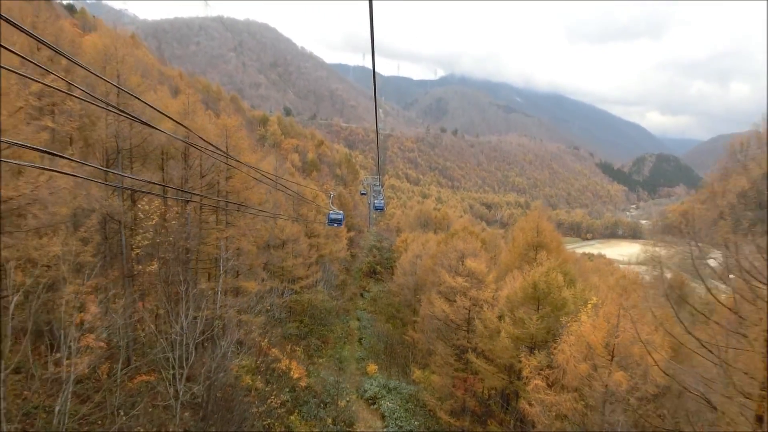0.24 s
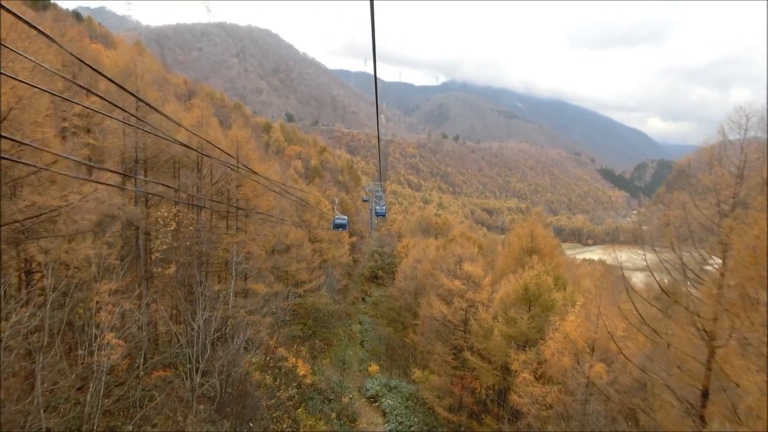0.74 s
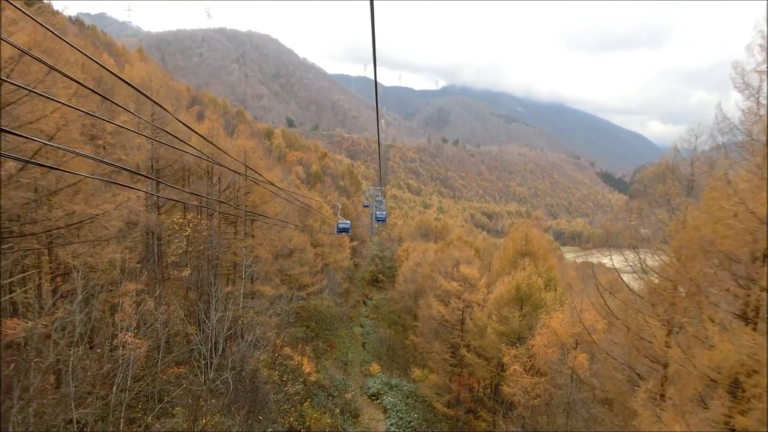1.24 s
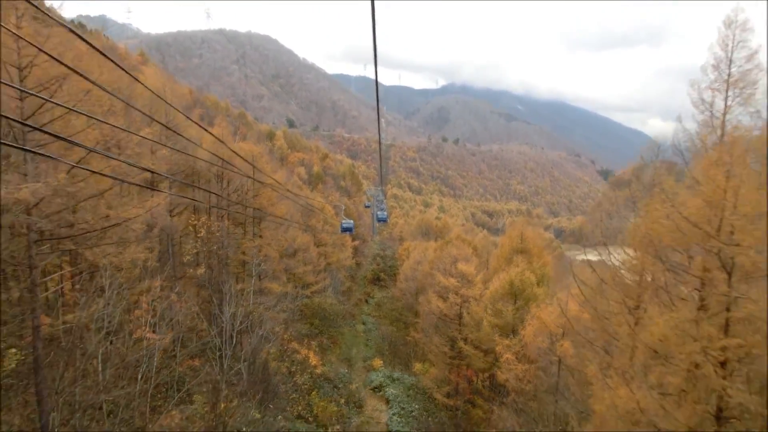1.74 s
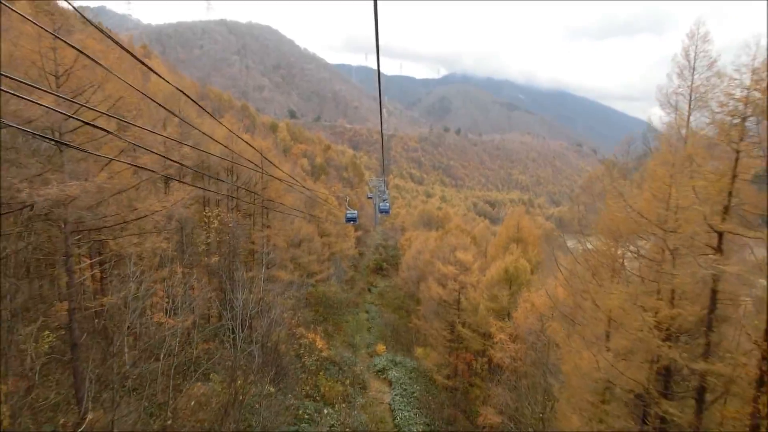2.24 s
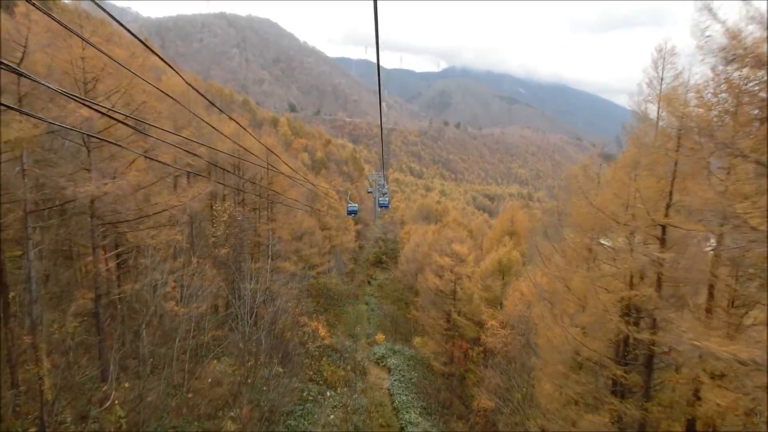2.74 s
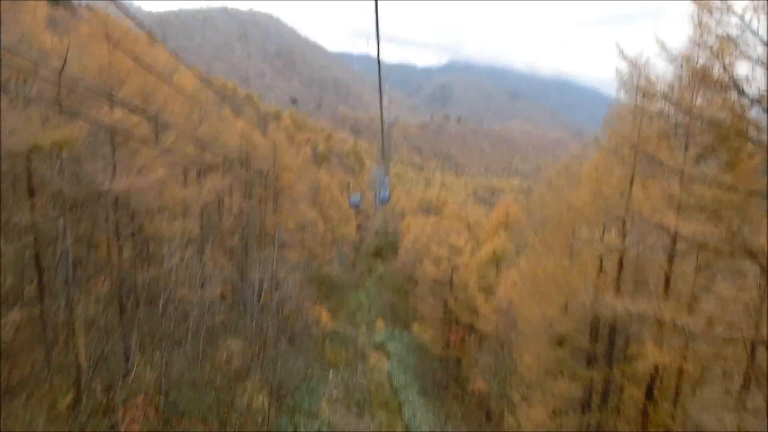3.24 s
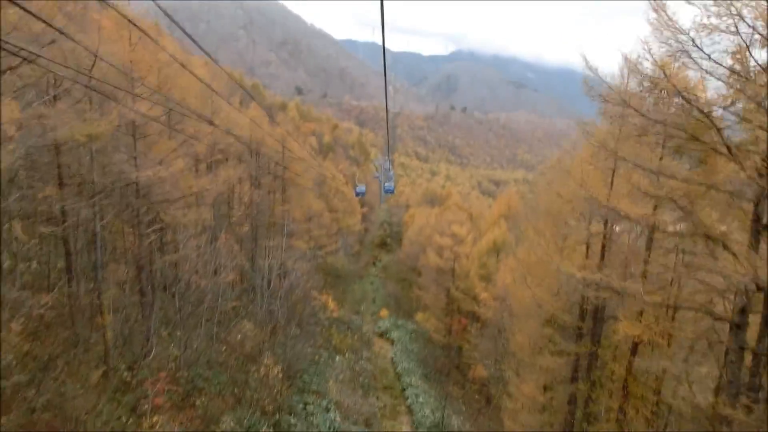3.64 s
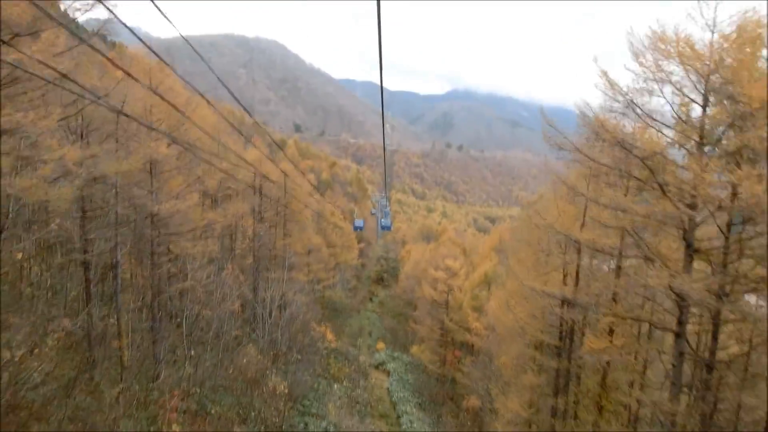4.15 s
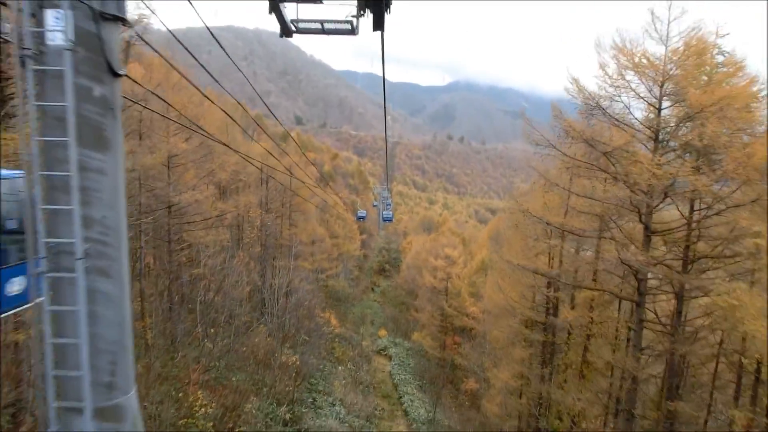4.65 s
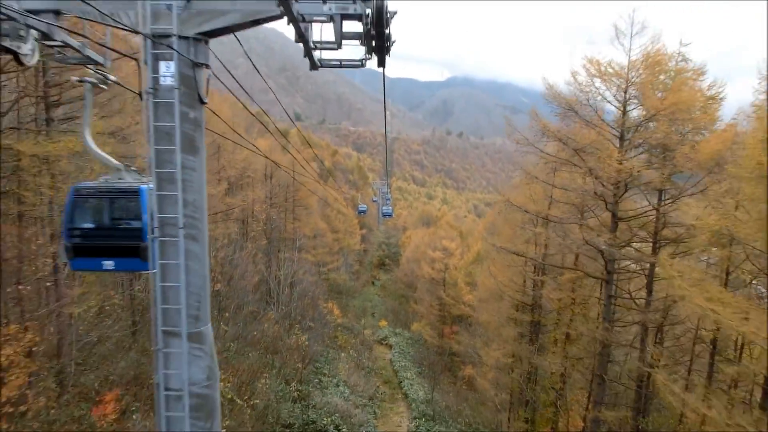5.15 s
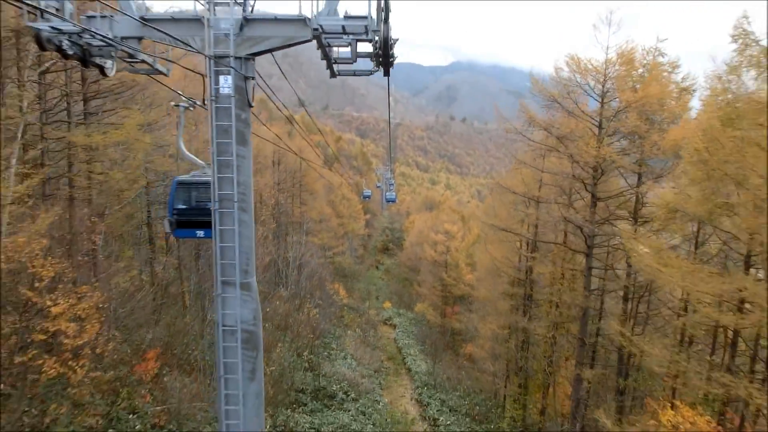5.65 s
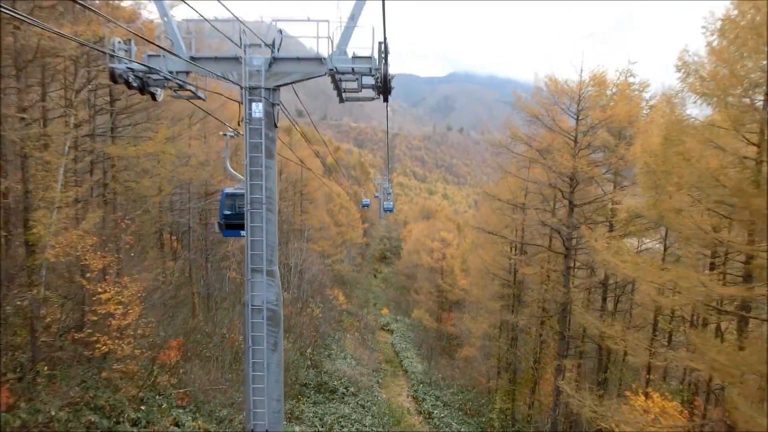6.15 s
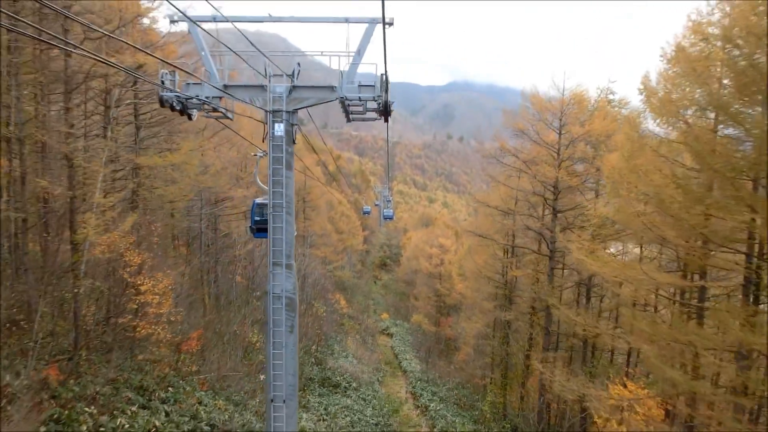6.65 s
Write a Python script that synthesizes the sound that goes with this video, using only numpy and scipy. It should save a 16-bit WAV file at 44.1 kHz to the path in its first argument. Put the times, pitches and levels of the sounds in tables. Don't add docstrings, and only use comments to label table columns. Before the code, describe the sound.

Heard close inside a moving gondola cabin: a deep, pulsing rope hum with faint wind hiss and small ticks. After three seconds the cabin reaches a tower; hard snaps, booming floor, grainy roar and metal cracks erupt, followed by a brighter clattering second wheel set. By about five seconds the rattle fades, leaving the low hum and a somewhat fuller rush of air.

```python
import sys
import numpy as np
from scipy import signal
from scipy.fft import rfft, irfft, next_fast_len
from scipy.io import wavfile

SR = 44100
rng = np.random.default_rng(int(sys.argv[2]) if len(sys.argv) > 2 else 0)


def gain_from_db(level_db):
    decades = np.asarray(level_db, float) / 20
    return 10 ** decades


def transcribe(signal):
    frames = np.atleast_2d(signal).T
    limited = np.clip(frames, -1, 1)
    pcm = np.round(limited * 32767).astype(np.int16)
    wavfile.write(sys.argv[1], SR, pcm)


N = 304012
LONG = next_fast_len(N)
HZ = np.fft.rfftfreq(LONG, 1 / SR)
TIME = np.arange(N) / SR

# [t/s, strand rate f/Hz, shell boom f/Hz, roof drone f/Hz]
ROPE = [(0.0, 81.3, 82, 241.7), (0.8, 84.2, 84, 249), (1.6, 86, 90, 258), (2.1, 86.77, 96, 262.4),
        (2.95, 88.23, 95, 264.8), (3.5, 87.6, 87.5, 261.4), (4.2, 85.2, 89, 255), (4.45, 84.2, 85, 260),
        (5.1, 84.5, 85, 264.3), (5.6, 84.5, 85, 266.7), (6.0, 83.87, 82.5, 262), (6.89, 83, 84, 251)]
# [start t/s, length t/s, level/dB]
BOOMS = [(.06, 0.21, -35), (.43, 0.067, -37.5), (.61, 0.15, -34), (.91, 0.26, -34), (1.27, 0.041, -31),
         (1.4, 0.14, -27.5), (1.62, 0.053, -28), (1.74, 0.2, -28), (2.02, 0.16, -26), (2.26, 0.15, -30.5),
         (2.49, 0.06, -26.5), (2.68, 0.13, -29.5), (2.92, 0.14, -27), (3.11, 0.22, -27), (3.5, 0.27, -20.5),
         (3.91, 0.052, -27), (4.04, 0.037, -27), (4.21, 0.02, -45), (4.35, 0.3, -26.5), (4.79, 0.057, -28),
         (4.98, 0.16, -27), (5.25, 0.02, -25.5), (5.4, 0.1, -25.5), (5.58, 0.12, -26), (5.8, 0.1, -28.5),
         (6.02, 0.04, -30), (6.22, 0.089, -31), (6.44, 0.11, -30.5), (6.69, 0.044, -29.5),
         (6.83, 0.072, -38)]
SWAYS = [(0, 0.22, -33.5), (.5, 0.093, -37), (.8, 0.047, -49), (1.12, 0.12, -40), (1.7, .12, -42),
         (2.17, .05, -32), (2.86, 0.044, -31), (3.06, 0.11, -20), (3.22, 0.19, -27), (3.47, 0.27, -20.5),
         (3.68, 0.51, -28.5), (4.37, 0.26, -34), (5.0, 0.12, -28), (5.43, 0.19, -28), (5.94, 0.12, -33.5),
         (6.14, 0.16, -32.5), (6.4, 0.21, -32.5), (6.74, 0.047, -31)]
# [start t/s, length t/s, level/dB, order]
SINGING = [(0, 0.28, -48.5, 4), (5.15, 0.07, -45, 4), (1.57, 0.21, -47, 4), (2.542, 0.29, -48, 4),
           (4.307, 0.18, -44, 4), (4.9, 0.15, -47, 4), (5.894, 0.35, -47.5, 4), (0, 0.23, -44.5, 2),
           (1.004, 0.4, -51, 2), (1.612, 0.51, -40, 2), (2.196, 0.2, -40.5, 2), (2.59, 0.12, -39, 2),
           (5.527, 0.25, -43, 2), (6.294, 0.23, -46, 2), (0.447, 0.69, -51, 3), (0.703, 0.33, -47.5, 2),
           (1.566, 0.16, -44, 3), (1.952, 0.94, -42, 3), (1.32, 0.26, -48.5, 2), (1.854, .08, -43, 2),
           (4.883, 0.094, -38, 3), (5.1, 0.14, -39, 3), (5.35, .1, -42.5, 3), (5.525, 0.067, -47, 3),
           (.98, 0.065, -50, 4), (5.74, 0.081, -44, 3), (6.33, 0.4, -44, 3)]
# [start t/s, length t/s, level/dB]
FIFTH_SPELLS = [
    (.98, .42, -58.5),
    (5.7, 0.15, -54),
]
CALM_DB = {"boom": -44, "sway": -41, "floor": -48.5, "wall": -76.5, "order": -55}
# [start t/s, length t/s, level/dB]
FLOOR_JOLTS = [(0, 0.074, -45), (1.65, .15, -48), (2.15, 0.08, -39), (2.75, 0.14, -38), (3.08, 0.072, -33),
               (3.18, 0.15, -21.5), (3.39, .12, -25), (3.61, 0.21, -26), (3.74, 0.073, -19.5),
               (3.88, 0.11, -30.5), (4.03, 0.37, -34), (4.47, 0.21, -31.5), (5.07, 0.043, -32),
               (5.27, 0.033, -36.5), (5.45, 0.24, -33), (6.3, 0.15, -40)]
WALL_JOLTS = [(1.65, 0.2, -65), (2.0, 0.22, -52), (2.74, 0.067, -39.5), (2.95, 0.094, -35),
              (3.17, 0.083, -26.5), (3.4, .33, -25), (3.9, 0.088, -32.5), (4.36, 0.081, -49),
              (4.48, 0.1, -35.5), (5.06, .08, -43), (5.42, 0.13, -31.5)]
# [t/s, level/dB]
SHAKE = [(0.0, -43), (1.4, -39), (2.15, -36), (2.9, -39.5), (2.99, -34), (3.11, -19), (3.3, -25),
         (3.45, -24), (3.59, -16.5), (3.7, -19.5), (3.95, -23.5), (4.06, -32.5), (4.14, -26), (4.42, -32.5),
         (4.54, -29), (4.78, -36), (5.5, -35.5), (6.89, -41)]
# [f/Hz, density level/dB per Hz]
SHUDDER = [(20, -10), (60, 5), (140, 3.5), (180, 1), (260, -2), (310, -5), (380, -12.5), (520, -17.5),
           (900, -25), (1600, -90)]
# [t/s, level/dB]
GRIP_PRESSURE = [
    [(2.9, -51), (3.04, -48), (3.07, -33.5), (3.18, -29), (3.3, -30.5), (3.43, -31), (3.58, -24.5),
     (3.65, -28), (4.065, -38.5)],
    [(4.05, -34), (4.09, -37.5), (4.146, -29.5), (4.216, -31), (4.25, -24), (4.33, -36), (4.38, -30.5),
     (4.74, -34.5), (5.1, -54)],
]
# [f/Hz, width f/Hz, level/dB]
PANELS = [
    [(707, 89, -2.5), (1630, 230, 0.5), (2100, 280, -1), (3200, 110, -20), (4750, 310, -9), (7300, 110, -23)],
    [(503, 38, -2.5), (929, 57, -2.5), (1930, 99, -5.5), (2600, 130, -14), (2800, 130, -17), (3390, 54, -7), (3700, 120, -3), (4360, 360, -5), (5180, 400, -1), (5900, 67, -18), (6750, 150, -27), (10700, 820, -8)],
]
# [f/Hz, density level/dB per Hz]
ROARS = [
    [(210, -29), (350, 0.5), (472, -7), (802, -3.5), (1380, -8.5), (1600, -14.5), (2580, -21), (4630, -23), (9000, -33.5), (11700, -54), (19800, -120)],
    [(210, -24), (350, 1), (459, -11), (498, -14), (603, -5.5), (918, -0.5), (1330, -7.5), (2540, -9.5), (9000, -29), (11700, -63), (19800, -120)],
]
# share of panel ring over roar, and treble [level/dB]
PANEL_SHARE = [0.48, 0.71]
RATTLE_TREBLE_DB = [-18.5, -11]
# [t/s, peak level/dB, treble level/dB, ring f/Hz]
KNOCKS = [(3.0575, -19.5, -46, 2050), (3.1553, -44, -40, 1660), (3.179, -17, -41, 1530),
          (3.2385, -25, -37.5, 2000), (3.2912, -25.5, -37.5, 2020), (3.3496, -44, -48, 1630),
          (3.4451, -20, -36, 2100), (3.455, -26, -43, 1620), (3.494, -40, -36, 1990),
          (3.51, -45, -42, 2080), (3.5297, -40, -43, 1690), (3.5781, -17.5, -52, 1500),
          (3.5934, -26, -55, 1493), (3.7367, -31, -65, 1200), (3.853, -25.5, -50, 1760),
          (3.955, -41, -62, 1570)]
# [t/s, peak level/dB, treble level/dB, ring f/Hz, treble centre f/Hz]
SNAPS = [
    (3.026, -11.5, -35, 3700, 6440),
    (3.058, -19, -49, 3220, 4250),
    (3.1776, -5, -37, 2400, 4340),
    (3.1965, -16, -23.5, 4260, 7000),
    (3.216, -35, -24, 2210, 6460),
    (3.4206, -13, -35, 1400, 5600),
    (4.229, -9, -22.5, 4500, 5600),
]
CLANKS = [(4.108, -30, -63, 1670, 8820), (4.1505, -19, -43, 1920, 8450), (4.1682, -23, -38, 1710, 11400),
          (4.192, -18.5, -57, 1930, 5700), (4.232, -11.5, -31.5, 2780, 5800),
          (4.2449, -17, -37, 1640, 6440), (4.2952, -18, -32, 1650, 5300), (4.364, -27, -32, 2040, 10700),
          (4.3833, -32, -46, 1640, 7200), (4.4143, -26, -40, 1900, 6860), (4.439, -18, -55, 2560, 4800),
          (4.5, -29, -45, 1930, 6700), (4.558, -24, -38, 2600, 5680), (4.613, -24, -37, 2140, 5650),
          (4.6372, -22, -33, 1930, 5470), (4.686, -37, -46, 2630, 8310), (4.7378, -26.5, -62, 2550, 7190)]
# [t/s, peak level/dB, centre f/Hz]
CRACKS = [(3.1783, -10, 2600), (3.183, -25, 1200), (3.239, -16, 1000), (3.4217, -16, 2500),
          (3.442, -23, 1800), (3.579, -15, 1800), (3.5955, -25, 1600), (3.742, -33, 1100),
          (3.9549, -22.5, 800), (4.126, -27, 900), (4.147, -16, 1200), (4.192, -23, 1800),
          (4.23, -12, 1200), (4.2467, -14, 1600), (4.4395, -29, 2600), (4.611, -19, 2550),
          (3.028, -20, 4000), (3.197, -29, 4500), (3.217, -28, 6000), (3.293, -35, 2000), (3.544, -17, 700),
          (3.62, -28, 700), (4.416, -24, 1000), (4.498, -31, 1200)]
# [f/Hz, level/dB, t60 t/s]
ARM = [(925, -2, 0.15), (1930, -4.5, 0.11), (2610, -6, 0.1), (2870, -16, .08), (4500, -13, .06),
       (5050, -13, 0.069)]
# [t/s, level/dB]
ARM_BLOWS = [(4.364, -29), (4.39, -30), (4.412, -35), (4.439, -30), (4.456, -35), (4.498, -30),
             (4.526, -38), (4.548, -30), (4.614, -34), (4.644, -30), (4.668, -42), (4.745, -38),
             (4.79, -40)]
# [t/s, peak level/dB, pitch f/Hz, t60 t/s]
THUDS = [(2.94, -37, 292, 0.38), (3.74, -19.5, 864, 0.052), (3.954, -24, 704, 0.047), (4.1, -30, 474, 0.65),
         (4.638, -31, 950, 0.12), (5.44, -48, 800, 0.2), (4.55, -34.5, 270.5, 0.75),
         (4.742, -36, 886, 0.13), (3.092, -29, 604, 0.094), (3.176, -18, 816, 0.073),
         (3.237, -19, 637, 0.058), (3.292, -30, 700, 0.12), (3.389, -32, 980, 0.04),
         (3.443, -24.5, 670, 0.11), (3.543, -25, 575, 0.1), (3.617, -27, 630, 0.081),
         (3.663, -24, 800, 0.068), (3.85, -35, 800, 0.09), (4.103, -32, 820, 0.078),
         (4.123, -28, 860, 0.092), (4.145, -22, 810, 0.11), (4.347, -31.5, 468, 0.13),
         (4.412, -33, 895, 0.055), (4.495, -34, 918, .07), (4.544, -33, 939, .08), (4.61, -36, 930, 0.089),
         (3.411, -39, 276, 0.22), (4.449, -34, 200, 0.36)]
# [t/s, peak level/dB, pitch f/Hz, t60 t/s]
FLECKS = [(3.178, -28, 4260, .04), (3.196, -24, 4400, .03), (3.236, -31, 4870, 0.067),
          (3.237, -43, 4300, 0.061), (3.289, -43, 4520, 0.045), (3.29, -35, 7300, .05),
          (3.347, -35, 4800, .08), (3.45, -44, 4760, .08), (3.472, -34, 4500, 0.044),
          (3.495, -47, 4800, .1), (3.523, -37, 5900, .07), (3.56, -32, 3200, .04),
          (3.572, -37, 4900, 0.099), (3.577, -27, 4320, .04), (3.776, -35.5, 1620, 0.33),
          (3.787, -32.5, 2160, 0.18), (3.816, -35.5, 2310, 0.18), (4.232, -33, 2980, 0.037),
          (4.245, -21, 3900, 0.044), (4.295, -42, 5900, 0.061), (4.36, -34, 2070, .12),
          (4.367, -36, 4650, .08), (4.415, -33, 4700, .04), (4.455, -31, 4470, .04),
          (4.458, -51, 2560, 0.3), (4.549, -32, 2860, 0.11), (4.565, -41, 3700, .06),
          (4.611, -35, 5850, .04), (4.612, -35, 4600, 0.2), (4.635, -31, 6000, 0.085),
          (4.665, -35, 1900, 0.12), (4.685, -39, 4250, 0.055), (4.738, -35, 2540, .04),
          (4.774, -37, 2500, 0.14), (4.81, -41, 2170, .12), (3.594, -17, 1510, 0.062),
          (4.72, -42, 3330, 0.24), (5.03, -41, 1010, 0.4), (3.092, -40, 4390, 0.043),
          (3.144, -42, 4410, .06), (3.156, -30, 5940, .04), (3.16, -39, 4750, .08), (3.162, -35, 4350, .08),
          (3.345, -44, 4390, .07), (3.31, -42, 4900, .06), (3.61, -50, 4900, .15), (3.7, -41, 4770, .06),
          (3.825, -41, 4420, .06), (3.92, -45, 4850, .12), (3.095, -30, 1020, 0.087),
          (3.255, -29, 2010, .06), (3.39, -31, 1000, 0.06), (3.577, -17, 1390, .04)]
# [t/s, peak level/dB, t60 t/s]
BUMPS = [
    (2.72, -51, 0.43),
    (5.3, -45, 0.7),
    (5.421, -42.5, 0.6),
    (5.7, -46.5, 0.37),
]
# [t/s, peak level/dB, pitch f/Hz]
TICKS = [
    (0.3244, -49, 7900),
    (0.564, -38, 3980),
    (1.1442, -43, 4880),
    (1.2451, -36, 11800),
    (1.5, -42, 6640),
    (3.061, -19, 3350),
    (5.07, -51, 2300),
    (5.46, -41, 4000),
    (6.66, -39, 4200),
]
# [start t/s, end t/s, level/dB]
RUSTLES = [
    (0.67, 1.16, -52.5),
    (2.171, 2.42, -57.5),
    (6.187, 6.37, -49.5),
]
# [start t/s, end t/s, level/dB, centre f/Hz]
GAP_HISS = [
    (2.3, 3.8, -64, 6500),
    (6.25, 6.9, -59, 7800),
    (5.2, 5.8, -59, 4150),
]
# [t/s, level/dB]
WIND = [(0.0, -53), (1.6, -53), (2.46, -52), (2.95, -48), (4.95, -46.5), (5.2, -48), (5.4, -48.5),
        (6.1, -49), (6.89, -48)]
# [f/Hz, density level/dB per Hz]
WIND_COLOUR = [(250, 3.5), (450, -3), (700, 2), (1100, 0.5), (1350, -5), (1660, -1), (1900, -5.5),
               (2200, -5), (2500, -9), (4000, -15.5), (6000, -17.5), (9000, -19), (12500, -23.5),
               (15000, -24.5)]
# [f/Hz, level/dB]
LEAN = [(60, 2.5), (130, 3), (290, 2.5), (640, 3), (1410, 2), (3100, 1.5), (8000, 2), (13000, 1.5)]
# [f/Hz, width f/Hz, added level/dB]
HOUSING = [(4390, 460, -13.5), (7200, 780, -9.5), (10700, 1200, -10.5)]


def evened(x):
    return x / np.sqrt(np.mean(x ** 2) + 1e-20)


def read(points, hz):
    f, value = np.transpose(points)
    return np.interp(np.log(hz + 1), np.log(f + 1), value)


def columns(rows):
    s, *rest = np.transpose(rows)
    return [np.interp(TIME, s, c) for c in rest]


def add(mix, s, sound):
    part = mix[round(s * SR):][:len(sound)]
    part += sound[:len(part)]


def drift(top_hz):
    steps = N // 128 + 2
    slow_hz = np.fft.rfftfreq(steps, N / SR / steps)
    wander = irfft(rfft(rng.standard_normal(steps)) / (1 + (slow_hz / top_hz) ** 4), steps)
    return evened(np.interp(TIME, np.linspace(0, N / SR, steps), wander))


def coloured(gain):
    return evened(irfft(rfft(rng.standard_normal(LONG)) * gain, LONG)[:N])


def ring(x, hz, width):
    pole = np.exp((2j * hz - width) * np.pi / SR)
    return evened(signal.lfilter([1], np.poly([pole, pole]), x).real)


def wavering(hz, waver_hz, rough):
    turn = 2 * np.pi * np.cumsum(hz + waver_hz * drift(7.14)) / SR
    in_phase = (1 + rough * drift(17.0)) * np.sin(turn)
    return evened(in_phase + rough * drift(9.5) * np.cos(turn))


def surges(rows, calm_db):
    swell_s, ebb_s = 0.012, 0.045
    t = TIME[::128]
    power = np.full(len(t), gain_from_db(2 * calm_db))
    for s, length, db in rows:
        away = np.maximum((s - t) / swell_s, (t - s - length) / ebb_s)
        power += gain_from_db(2 * db) * np.exp(-np.clip(away + .5, 0, 9) ** 2)
    return np.interp(TIME, t, np.sqrt(power))


def hail(size):
    strength = gain_from_db(0.78 * np.minimum(rng.exponential(1, size), 4))
    return strength * (rng.random(size) < 4000 / SR) * rng.standard_normal(size)


def stirred(blows):
    strike_db, strike_t60 = 18, .09
    gain, t = np.ones(N), TIME[:SR // 4]
    for s, db, *rest in blows:
        add(gain, s, gain_from_db(db + strike_db - 60 * t / strike_t60))
    return gain


def shell():
    boom = wavering(columns(ROPE)[1], waver_hz=2, rough=.2)
    sway = wavering(41.93, waver_hz=4, rough=.5)
    rumble = ring(rng.standard_normal(N), 33, 26)
    booming = surges(BOOMS, CALM_DB["boom"]) * boom
    return booming + surges(SWAYS, CALM_DB["sway"]) * evened(sway + 0.83 * rumble)


def strands():
    levels = []
    for order in range(2, 5):
        spells = [row[:3] for row in SINGING if round(row[3]) == order]
        levels.append(surges(spells, CALM_DB["order"]))
    levels.append(levels[-1] * gain_from_db(-14) + surges(FIFTH_SPELLS, -68))
    strand_hz, boom_hz, roof_hz = columns(ROPE)
    pitches = [1.2 * strand_hz + .8 * boom_hz, roof_hz, 4 * strand_hz, 5 * strand_hz]
    return sum(level * wavering(hz, waver_hz=2, rough=0.36) for level, hz in zip(levels, pitches))


def shocks():
    floor = surges(FLOOR_JOLTS, CALM_DB["floor"]) * wavering(119.9, waver_hz=4, rough=0.8)
    wall = surges(WALL_JOLTS, CALM_DB["wall"]) * wavering(212.5, waver_hz=4, rough=0.6)
    shaking = gain_from_db(columns(SHAKE)[0]) * coloured(gain_from_db(read(SHUDDER, HZ)))
    return floor + wall + shaking


def rattle():
    flare_db, flare_hz, lumps_db, lumps_hz = 3.3, 24, 2.4, 35
    out = np.zeros(N)
    wheel_sets = zip(GRIP_PRESSURE, PANELS, ROARS, PANEL_SHARE, RATTLE_TREBLE_DB, (KNOCKS, CLANKS))
    for pressure, panel, roar, share, treble_db, blows in wheel_sets:
        part = slice(round(pressure[0][0] * SR), round(pressure[-1][0] * SR))
        t, stir = TIME[part], stirred(blows)[part]
        rings = []
        for hz, width, db in panel:
            flare = gain_from_db(db + flare_db * drift(flare_hz)[part])
            rings.append(flare * ring(stir * hail(len(t)), hz, 1.22 * width))
        broad = evened(irfft(rfft(hail(LONG)) * gain_from_db(read(roar, HZ)), LONG)[part])
        low = evened(broad + share * evened(sum(rings[:4])))
        high = evened(sum(rings[4:]) / 2 + .5 * ring(hail(len(t)), 9100, 13000))
        gate = np.clip(np.minimum(t - t[0], t[-1] - t) / 0.0096, 0, 1)
        level = gain_from_db(columns(pressure)[0] - 4.5 + lumps_db * drift(lumps_hz))[part]
        out[part] += gate * level * (low + gain_from_db(treble_db) * high)
    return out


def knocks():
    out, t = np.zeros(N), TIME[:SR // 8]
    blows = [(*row, 0.032) for row in SNAPS]
    blows += [(*row, 5200, 0.23) for row in KNOCKS]
    blows += [(*row, 0.28) for row in CLANKS]
    for s, db, treble_db, hz, treble_hz, usual_t60 in blows:
        t60 = usual_t60 / (2.5 + 0.052 * max(db + 8, 0))
        fade = gain_from_db(-60 * (t / max(t60, .008)) ** 1.08) * np.minimum(t / 0.00058, 1)
        noise = rng.standard_normal((2, len(t)))
        body = 0.42 * ring(noise[0], hz, 650) + 0.6 * ring(noise[0], 2200, 4200)
        edge = 0.26 * ring(noise[1], treble_hz, 1700) + 0.5 * ring(noise[1], 8700, 8700)
        add(out, s, fade * (gain_from_db(db - 10.5) * body + gain_from_db(treble_db + 4.5) * edge))
    return out


def cracks():
    out, t = np.zeros(N), TIME[:SR // 20]
    for s, db, hz in CRACKS:
        splinter = 0.43 * gain_from_db(-60 * t / .016) * rng.standard_normal(len(t))
        crack = np.diff(ring((t == 0) + splinter, hz, 1.8 * hz), prepend=0)
        add(out, s, gain_from_db(db - 8) * crack / abs(crack).max())
    return out


def arm():
    scatter_db, detune = 4, .02
    out, t = np.zeros(N), TIME[:SR // 4]
    hz, mode_db, t60 = np.transpose(ARM)[:, :, None]
    chances = rng.standard_normal((len(ARM_BLOWS), 2, len(ARM), 1))
    for (s, db), (luck, off) in zip(ARM_BLOWS, chances):
        level = gain_from_db(db + mode_db + scatter_db * luck - 60 * t / t60)
        modes = level * np.sin(2 * np.pi * hz * (1 + detune * off) * t)
        add(out, s, np.minimum(t / 0.0027, 1) * modes.sum(0))
    return out


def thuds():
    out, t = np.zeros(N), TIME[:SR // 4]
    for s, db, hz, t60 in THUDS:
        fade = gain_from_db(db - 60 * t / t60) * np.minimum(t / 0.0053, 1)
        add(out, s, fade * ring(rng.standard_normal(len(t)), hz, 0.45 * hz))
    return out


def flecks():
    out, t = np.zeros(N), TIME[:SR // 4]
    for s, db, hz, t60 in FLECKS:
        tone = np.sin(2 * np.pi * hz * t) + 1.1 * ring(rng.standard_normal(len(t)), hz, 420)
        add(out, s, gain_from_db(db - 6.5 - 60 * t / t60) * np.minimum(t / 0.00079, 1) * tone)
    return out


def bumps():
    out, t = np.zeros(N), TIME[:SR // 4]
    for s, db, t60 in BUMPS:
        fade = gain_from_db(db - 60 * t / t60) * np.minimum(t / 0.02, 1)
        add(out, s, fade * ring(rng.standard_normal(len(t)), 800, 960))
    return out


def ticks():
    out, t = np.zeros(N), TIME[:SR // 8]
    for s, db, hz in TICKS:
        add(out, s, gain_from_db(db - 8.0 - 60 * t / 0.025) * ring(rng.standard_normal(len(t)), hz, 370))
    return out


def rustles():
    level = np.zeros(N)
    for start, end, db in RUSTLES:
        level += gain_from_db(db) * np.clip(np.minimum((TIME - start) / .06, (end - TIME) / 0.2), 0, 1)
    bright = 1 / (1 + (4200 / (HZ + 1)) ** 4) / (1 + (HZ / 13000) ** 2)
    return level * gain_from_db(1.5 * drift(13)) * coloured(bright)


def gap_hiss():
    out = np.zeros(N)
    for start, end, db, hz in GAP_HISS:
        fade = np.clip(np.minimum(TIME - start, end - TIME) / 0.065, 0, 1)
        out += gain_from_db(db) * fade * ring(rng.standard_normal(N), hz, 1400)
    return out


def air():
    fizz_hz, fizz_db = 3040, -3
    wind_db, = columns(WIND)
    upper = 1 / np.sqrt(1 + (fizz_hz / (HZ + 1)) ** 4)
    shape = gain_from_db(read(WIND_COLOUR, HZ))
    rush = gain_from_db(wind_db + 0.5 + 1.9 * drift(2.0)) * coloured(shape * np.sqrt(1 - upper ** 2))
    fizz = gain_from_db(wind_db + fizz_db + 1.5 + 0.66 * drift(26)) * coloured(shape * upper)
    return rush + fizz


def scene():
    apart_hz, alike = 7660, 0.35
    lead_hz, lead_rad = 9000, 1.72
    left, other = (rattle() + knocks() + ticks() + rustles() + air() for port in range(2))
    left += shell() + strands() + shocks() + cracks() + arm() + thuds() + flecks() + bumps() + gap_hiss()
    left, other = rfft(left, LONG), rfft(other, LONG)
    same = np.clip(alike + (1 - alike) * np.exp(-(HZ / apart_hz) ** 2), 0, 1)
    lead = lead_rad / (1 + (lead_hz / (HZ + 1)) ** 8)
    right = same * np.exp(-1j * lead) * left + np.sqrt(1 - same ** 2) * other
    lean = gain_from_db(read(LEAN, HZ) / 2)
    return irfft([left * lean, right / lean], LONG, axis=1)[:, :N]


def roll_off(x):
    return signal.sosfilt(signal.butter(12, 15710, fs=SR, output="sos"), x)


def record(dry):
    colour = 1 + sum(gain_from_db(db) / (1 + (2 * (HZ - hz) / width) ** 2) for hz, width, db in HOUSING)
    bass_cut = 1 + (34 / (HZ + 1)) ** 6
    treble_cut = 1 + (HZ / 14900) ** 200
    heard = rfft(dry, LONG, axis=1) * colour / bass_cut / treble_cut
    return roll_off(irfft(heard, LONG, axis=1)[:, :N])


dry = scene()
out = record(dry)
transcribe(out)
```